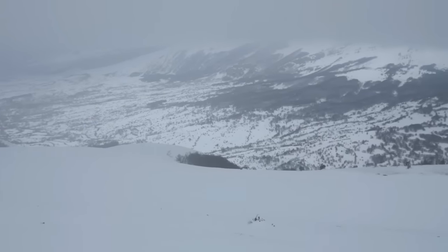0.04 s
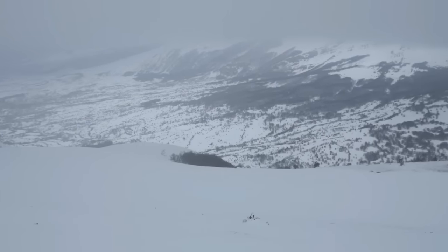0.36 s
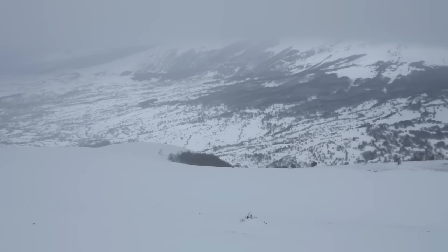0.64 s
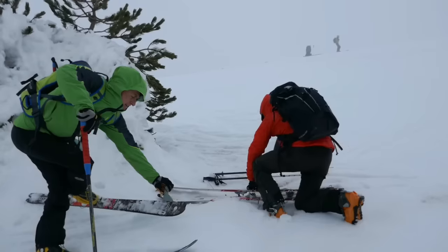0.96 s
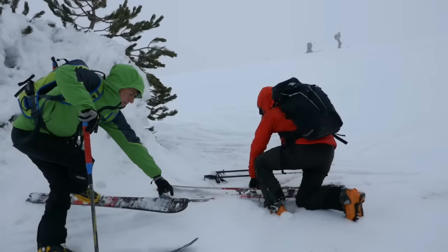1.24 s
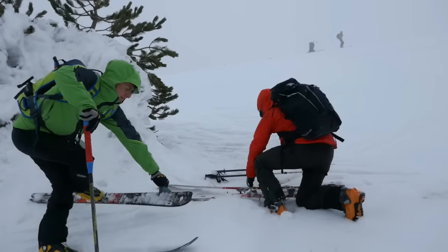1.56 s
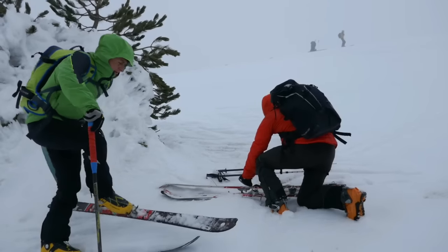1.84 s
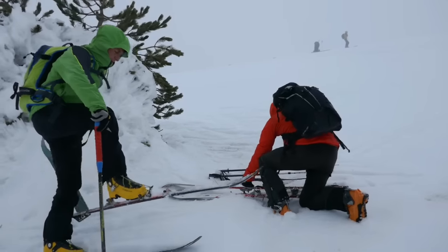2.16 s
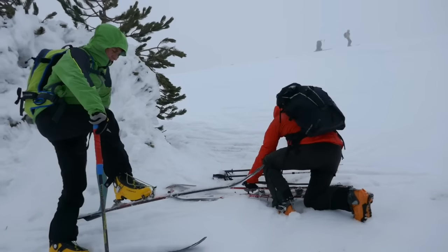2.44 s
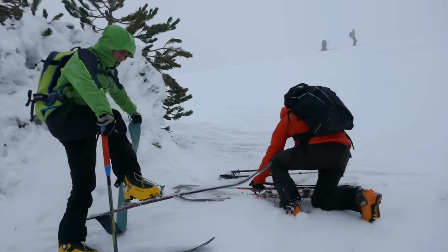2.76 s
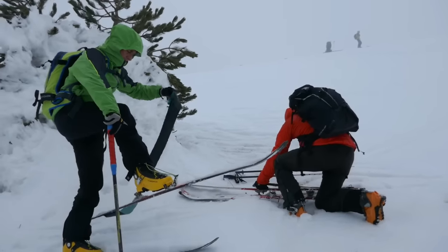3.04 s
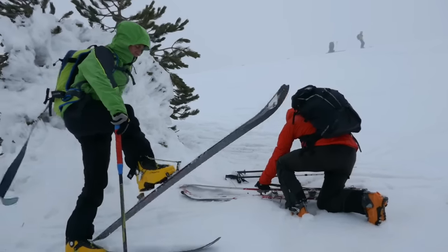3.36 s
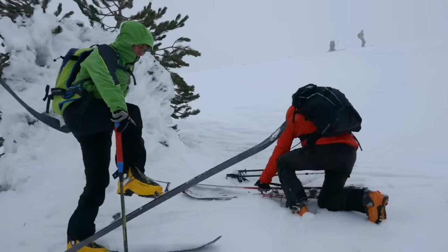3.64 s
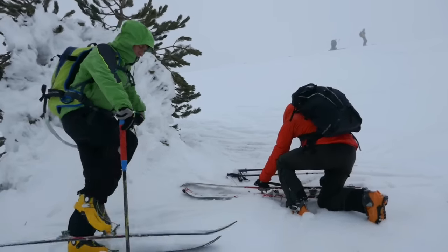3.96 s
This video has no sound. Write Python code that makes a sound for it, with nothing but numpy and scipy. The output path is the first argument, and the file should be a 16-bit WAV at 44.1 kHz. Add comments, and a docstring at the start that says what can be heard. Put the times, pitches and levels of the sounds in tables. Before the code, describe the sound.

Gusty wind rumbling on the microphone, with a short rip of a skin leaving a ski.

```python
"""A windy snow slope, where a climbing skin is ripped off a ski a few metres away.
Gusts rumble, thump and splutter on the microphone; the sound drops out briefly and returns with a tick.
The glue tears in one quick pull, a dense stream of tiny snapping threads, then peels on quietly.
The end of the skin snaps free and flaps, knocking the ski into a short ring."""
import sys
import numpy as np
from scipy import signal
from scipy.fft import rfft, irfft
from scipy.io import wavfile
from scipy.ndimage import uniform_filter1d

SR = 44100
rng = np.random.default_rng(int(sys.argv[2]) if len(sys.argv) > 2 else 0)


def wav_out(sig):
    """Save sig, one row per channel (or a flat mono array), as 16-bit PCM at SR to the path in sys.argv[1]."""
    wavfile.write(sys.argv[1], SR, np.round(np.clip(np.atleast_2d(sig).T, -1, 1) * 32767).astype(np.int16))


N = 176400
T = np.arange(N) / SR

# stretches of sound on either side of the dropout (start [s], end [s])
AUDIBLE_SPANS = [(0, .783), (1.152, 4.1)]
# tone of wind rasping in the microphone port (frequency [Hz], relative level [dB])
RASP_SPECTRUM = [(150, 11.5), (500, 11.5), (1000, 0.5), (1600, 3.5), (2500, -4), (3300, -20.5),
                 (5000, -34.5), (15000, -82)]
# tone of the tearing glue (frequency [Hz], relative level [dB])
GLUE_SPECTRUM = [(300, -21.5), (900, 4), (2000, 10), (3200, -2), (4800, -2), (6500, -13), (8300, -16.5),
                 (9700, -8.5), (12000, -19), (15500, -22.5)]
RASP_PAN_DB, WIND_LAG_S = 11.5, 0.00033


def amp(db):
    """Decibels to gain."""
    return 10 ** (np.asarray(db) / 20)


def unit(x):
    """Scales to rms 1."""
    return x / np.sqrt(np.mean(x ** 2) + 1e-20)


def curve(points):
    """Joins (time, value) points by straight lines."""
    return np.interp(T, *np.transpose(points))


def pan(db):
    """Left and right gains for a level difference; positive is left."""
    return amp([[db / 2], [-db / 2]]) / np.cosh(db * np.log(10) / 40)


def colour(x, spectrum, lag_s=0, tilt_db=0):
    """Equal-power EQ, tilted by tilt_db per octave above 1 kHz; the right channel may lag."""
    hz = np.fft.rfftfreq(N, 1 / SR)
    band_hz, db = np.transpose(spectrum)
    db = db + tilt_db * np.log2(np.maximum(band_hz / 1000, 1))
    low_cut = np.minimum(hz / band_hz[0], 1)
    gain = unit(amp(np.interp(np.log(hz + 1), np.log(band_hz), db)) * low_cut)
    delay = np.exp(-2j * np.pi * hz * np.array([[0], [lag_s]]))
    return irfft(rfft(x) * gain * delay, N)


def stereo_noise(correlation):
    """White noise, from wide (0) to mono (1)."""
    centre, *sides = rng.standard_normal((3, N))
    return np.sqrt(correlation) * centre + np.sqrt(1 - correlation) * np.array(sides)


def swirl(rate_hz, depth_db):
    """A random gain of mean power 1 that wavers up to about the given rate."""
    hz = np.fft.rfftfreq(N, 1 / SR)
    band = hz / (hz + rate_hz / 10) / (1 + (hz / rate_hz) ** 4)
    wander = unit(irfft(rfft(rng.standard_normal(N)) * band, N))
    return unit(amp(depth_db * 2 * np.tanh(wander / 2)))


def swell(start, width_s, peak_s):
    """A smooth rise and fall as an eddy passes, highest peak_s after its start."""
    out = np.zeros(N)
    near = slice(*np.searchsorted(T, [start - .1, start + .1]))
    out[near] = np.exp(-np.minimum(((T[near] - start - peak_s) / width_s) ** 2, 20))
    return out


def air():
    """A faint, wide bed of hissing air."""
    # (frequency [Hz], relative level [dB])
    spectrum = [(300, 6.5), (2300, -6.5), (4000, -19.5), (15000, -24.0)]
    return amp(-68.5) * colour(stereo_noise(0.21), spectrum)


def wind():
    """Turbulence at the microphone: rumble, a faster flutter, and crackle that grows with the gust."""
    # gust strength before and after the dropout (time [s], relative level [dB])
    early_gusts = [(0, -31.5), (.05, -28), (.24, -26.5), (.35, -36.5), (.49, -27), (.63, -25), (.68, -39.5),
                   (.78, -33)]
    late_gusts = [(1.16, -21), (1.39, -28.5), (1.63, -26.5), (1.7, -33), (1.78, -23), (1.835, -35),
                  (1.87, -24), (2.46, -26), (2.49, -37.5), (2.555, -44.5), (2.585, -24), (2.645, -26),
                  (2.675, -46), (2.755, -43.5), (2.78, -25), (2.92, -31.5), (2.98, -26.5), (3.12, -28.5),
                  (3.16, -42), (3.35, -33.5), (3.5, -36), (3.56, -23), (3.63, -28.5), (3.75, -23.5),
                  (3.83, -30.5), (4, -23)]
    # tone of the low and the mid turbulence (frequency [Hz], relative level [dB])
    rumble_spectrum = [(20, -38), (40, -20), (80, 7.5), (180, 12), (320, -4.5), (900, -75.5)]
    flutter_spectrum = [(60, -12.5), (290, 3), (650, -13), (1000, -21.5), (2200, -51.5), (6000, -84)]
    usual_gust_db, crackle_growth = -27, 1.4
    gust_db = curve(early_gusts + late_gusts)
    gust = amp(gust_db)
    eddies = swirl(rate_hz=83, depth_db=6)
    rumble = colour(stereo_noise(0.98) * gust * swirl(rate_hz=25, depth_db=0.5), rumble_spectrum)
    flutter = colour(stereo_noise(0.99) * gust * eddies, flutter_spectrum, WIND_LAG_S)
    surge = amp(crackle_growth * (gust_db - usual_gust_db)) * eddies
    crackle = colour(stereo_noise(0.72) * surge * swirl(rate_hz=230, depth_db=13), RASP_SPECTRUM)
    return amp(-3.5) * (rumble + pan(-6) * flutter) + amp(-53.5) * pan(RASP_PAN_DB) * crackle


def thumps():
    """Each large eddy shakes the pressure for a few uneven cycles; stronger ones are deeper."""
    # eddies hitting the microphone (time [s], relative peak [dB])
    hits = [(.037, -13), (.613, -21), (1.27, -11.5), (1.428, -10), (1.629, -8.5), (1.858, -14),
            (1.884, -14.5), (2.026, -15), (2.189, -12), (2.362, -11.5), (2.772, -18.5), (2.822, -16),
            (2.874, -17.5), (2.888, -15.5), (3.535, -17), (3.56, -11.5), (3.608, -18.5), (3.673, -12.5),
            (3.731, -10), (3.793, -12), (3.852, -15.5), (3.965, -13.5)]
    base_hz, hz_per_db = 90.2, 13
    out = np.zeros(N)
    wobble = unit(uniform_filter1d(rng.standard_normal(N), size=90))
    for (start, db), phase in zip(hits, rng.random(len(hits))):
        hz = base_hz - hz_per_db * db
        cycles = np.cumsum(hz * (1 + 0.32 * wobble)) / SR + phase
        out += amp(db) * swell(start, width_s=0.005, peak_s=0.005) * np.sin(2 * np.pi * cycles)
    low_cut = signal.butter(2, 85, "high", fs=SR, output="sos")
    return amp(-0.5) * pan(-4) * signal.sosfiltfilt(low_cut, out)


def splutters():
    """Fast eddies, each amid smaller ones, rasp in the left port and blow hollowly in the right."""
    # eddies in the microphone port (time [s], relative peak [dB], half-width [s])
    puffs = [(.058, -30.5, 0.0057), (.095, -34.5, 0.0044), (0.149, -37, 0.017), (0.1806, -32.5, 0.0015),
             (0.2227, -31, 0.0054), (0.247, -36.5, .01), (0.3957, -40, 0.0038), (0.4798, -32, 0.0025),
             (0.5074, -36, 0.0079), (0.5257, -30.5, 0.0028), (0.6107, -38, 0.0013), (1.2436, -37, 0.0012),
             (1.4304, -36, .004), (1.56, -30.5, .002), (1.5942, -37.5, 0.0017), (1.616, -26, 0.0017),
             (1.631, -32, 0.0054), (1.86, -24.5, 0.0013), (2.0494, -30.5, 0.0017), (2.1161, -31, 0.0031),
             (2.2016, -30.5, .003), (2.2722, -33, 0.0068), (2.324, -28, .004), (2.3496, -30, 0.0032),
             (2.3653, -26, 0.0024), (2.4056, -31, 0.0093), (2.453, -35.5, .009), (2.5116, -37, 0.0013),
             (2.585, -31, 0.0023), (2.826, -39.5, 0.0073), (2.8922, -31, 0.003), (3.0521, -31, 0.0013),
             (3.557, -23.5, 0.0069), (3.58, -29.5, 0.0036), (3.604, -30.5, .0015), (3.738, -34.5, 0.0075)]
    # hollow tone of the port (frequency [Hz], relative level [dB])
    hollow_spectrum = [(150, -21), (470, 3.5), (1200, -21), (4000, -70.5)]
    rise_s, skirt_s = 0.0026, 0.014
    core = sum(amp(db) * swell(start, width, rise_s) for start, db, width in puffs)
    skirt = sum(amp(db) * swell(start, skirt_s, rise_s) for start, db, _ in puffs)
    envelope = core + amp(-13) * skirt * swirl(rate_hz=410, depth_db=9.5)
    rasp = colour(stereo_noise(0.84) * envelope, RASP_SPECTRUM)
    hollow = colour(stereo_noise(0.92) * envelope, hollow_spectrum, WIND_LAG_S)
    return amp(-2) * pan(RASP_PAN_DB) * rasp + amp(3) * pan(-29.5) * hollow


def glue_threads(spread_db, correlation, snaps_per_s=7200):
    """Tiny snaps of glue threads, of uneven size."""
    snaps = rng.random(N) < snaps_per_s / SR
    sizes = amp(spread_db * np.minimum(rng.exponential(1, N), 4))
    return unit(snaps * sizes * stereo_noise(correlation))


def ski_reflection(x):
    """A reflection off the ski combs the sound, coming sooner as each pull goes on."""
    # lag of the reflection (time [s], delay [s])
    delays = [(1.82, .0013), (2, 0.0011), (2.7, .00135), (3.25, .001)]
    return x + 0.22 * np.array([np.interp(T - curve(delays), T, side) for side in x])


def quick_pull():
    """Glue threads snap in a dense, rasping stream that brightens along the ski."""
    # envelope of the tearing glue (time [s], level [dB])
    envelope = [(1.69, -78), (1.765, -52), (1.855, -41.5), (1.905, -51), (2.015, -48), (2.05, -66.5)]
    start, end = envelope[0][0], envelope[-1][0]
    pull = amp(curve(envelope)) * (T > start) * (T < end)
    tear = glue_threads(spread_db=-4.5, correlation=0.73) * pull * swirl(rate_hz=240, depth_db=-1)
    progress = np.clip((T - start) / (end - start), 0, 1)
    crossfade = progress ** 2 / (progress ** 2 + (1 - progress) ** 2)
    darker = colour(tear * (1 - crossfade), GLUE_SPECTRUM)
    brighter = colour(tear * crossfade, GLUE_SPECTRUM, tilt_db=1.5)
    return darker + brighter


def slow_peel():
    """Glue threads let go in a quiet, dull rustle, heard from the end of the dropout."""
    # envelope of the peeling, rustling skin (time [s], level [dB])
    envelope = [(1.15, -65.5), (2.1, -59), (2.55, -65.5), (2.8, -57.5), (3.18, -65.5), (3.38, -54.5),
                (3.7, -70)]
    peel = glue_threads(spread_db=2, correlation=0.92) * amp(curve(envelope))
    return colour(peel * (T > AUDIBLE_SPANS[1][0]), GLUE_SPECTRUM, tilt_db=-5.5)


def flaps():
    """Short scrapes of the skin's end knock the ski into ringing and leave a faint sizzle."""
    # the end tearing free and flapping (time [s], length [s], scrape level [dB], knock level [dB])
    slaps = [(2.663, 0.0037, -51.5, -76), (3.411, 0.013, -38, -34), (3.4407, 0.0013, -41, -65),
             (3.477, 0.0035, -44, -54), (3.937, 0.0054, -49, -63)]
    # resonances of the ski (frequency [Hz], relative level [dB])
    ski_modes = [(1480, -16), (1674, 2), (2234, -12)]
    rise_s, ski_t60_s = 0.0028, 0.04

    def envelopes(fall_s):
        """One row a flap: a fast attack, then a decay once its length is up."""
        return np.array([np.clip((T - start) / rise_s, 0, 1)
                         * np.exp(-np.clip((T - start - length) / fall_s, 0, 20))
                         for start, length, *_ in slaps])

    scrape_gains, knock_gains = amp(np.transpose(slaps)[2:])
    contact = envelopes(fall_s=0.0051)
    sizzle = amp(-12.5) * envelopes(fall_s=0.031)
    t = T[:SR // 10]
    ring = sum(amp(db - 60 * t / ski_t60_s) * np.sin(2 * np.pi * hz * t) for hz, db in ski_modes)
    grains = glue_threads(spread_db=4, correlation=0.96)
    knocks = grains * (knock_gains @ contact)
    ski = signal.oaconvolve(knocks, ring[None] / np.linalg.norm(ring))[:, :N]
    scrape = grains * (scrape_gains @ (contact + sizzle))
    return colour(scrape, GLUE_SPECTRUM) + ski


def scene():
    """Air and buffeting wind around the skin coming off the ski."""
    weather = air() + wind() + thumps() + splutters()
    return weather + ski_reflection(quick_pull() + slow_peel()) + flaps()


def record(dry):
    """A brief dropout that ends in a tick, then a steep high cut."""
    gate = sum((T >= start) & (T < end) for start, end in AUDIBLE_SPANS)
    gated = dry * uniform_filter1d(gate.astype(float), size=16)
    gated[:, round(AUDIBLE_SPANS[1][0] * SR)] += amp(-28)  # the tick
    high_cut = signal.firwin(511, 15800, window=("kaiser", 9), fs=SR)
    return signal.oaconvolve(gated, high_cut[None], "same")


dry = scene()
out = record(dry)
wav_out(out)
```